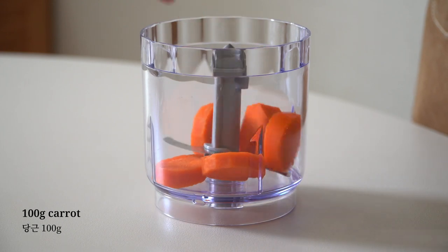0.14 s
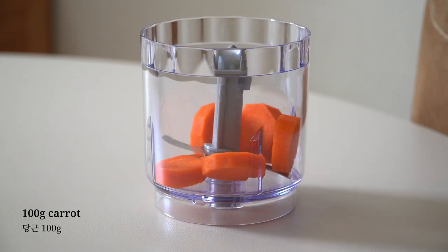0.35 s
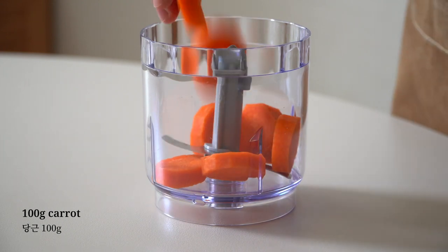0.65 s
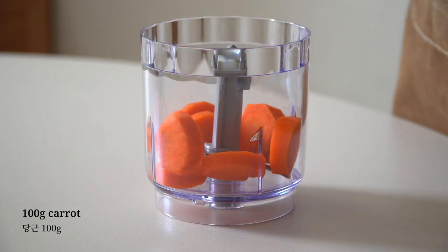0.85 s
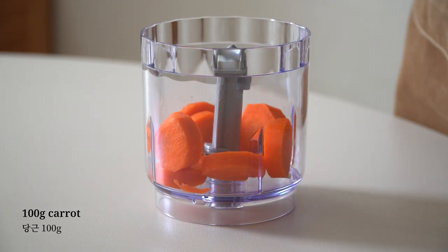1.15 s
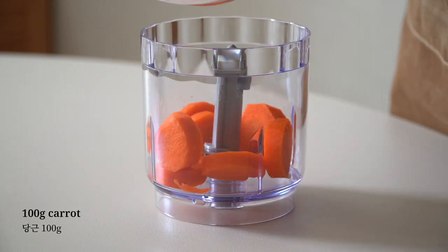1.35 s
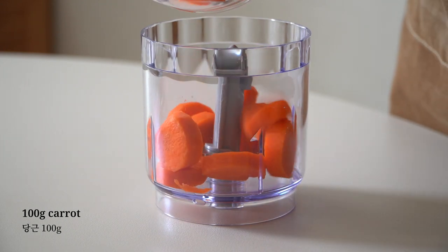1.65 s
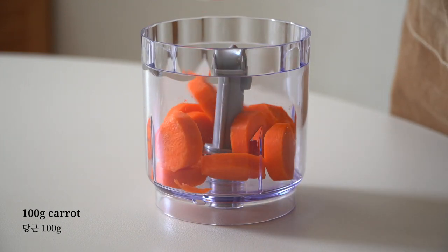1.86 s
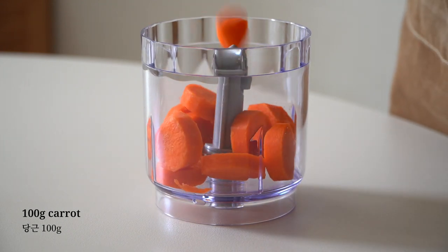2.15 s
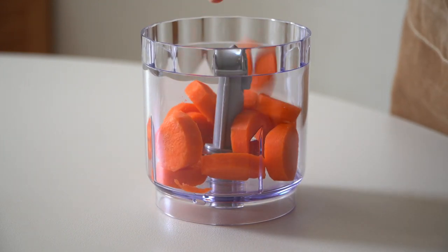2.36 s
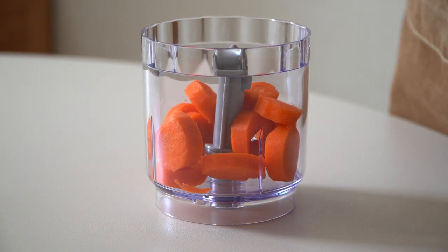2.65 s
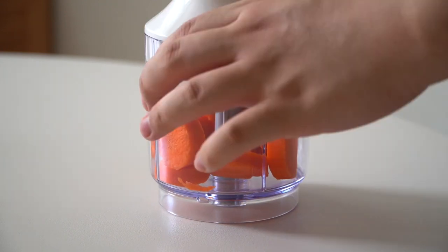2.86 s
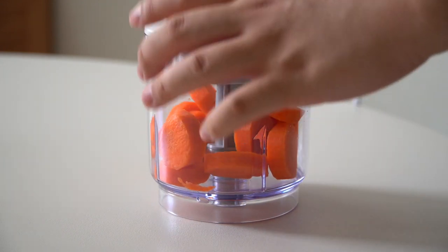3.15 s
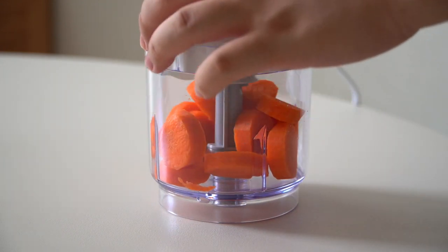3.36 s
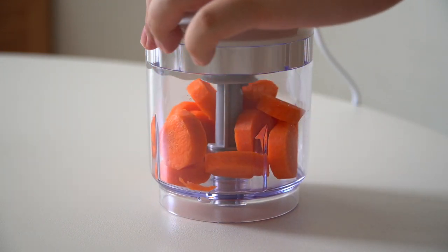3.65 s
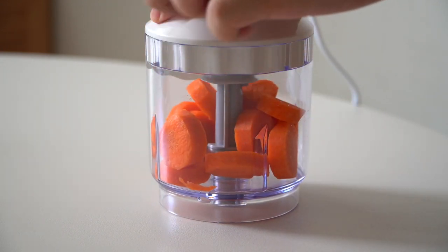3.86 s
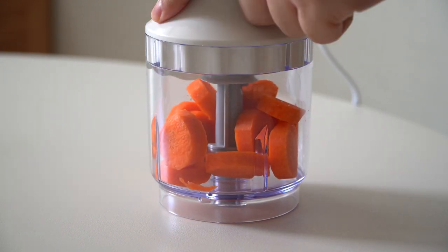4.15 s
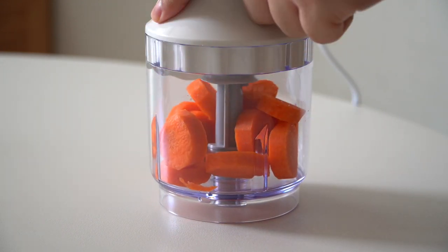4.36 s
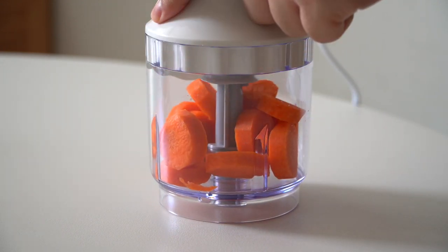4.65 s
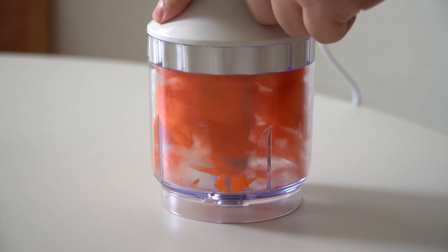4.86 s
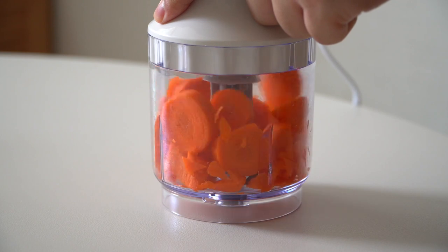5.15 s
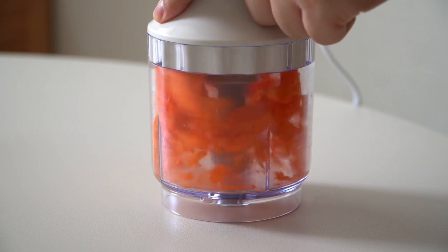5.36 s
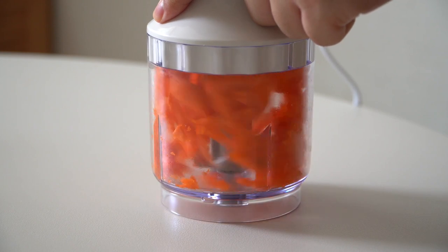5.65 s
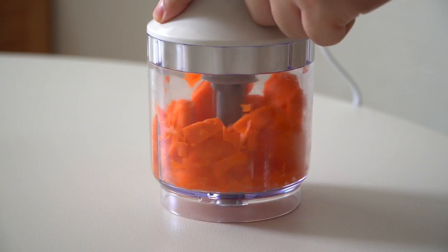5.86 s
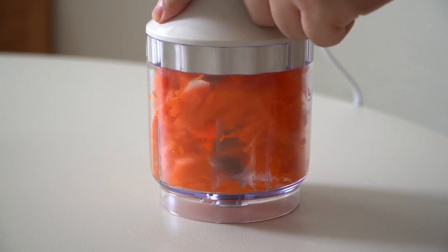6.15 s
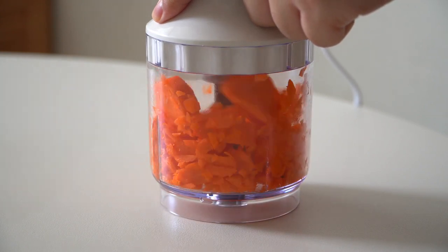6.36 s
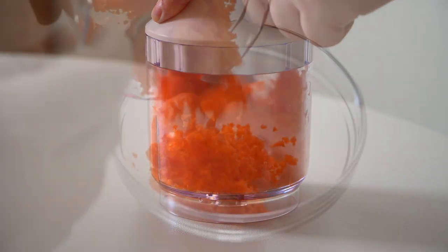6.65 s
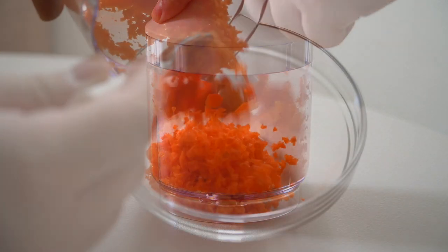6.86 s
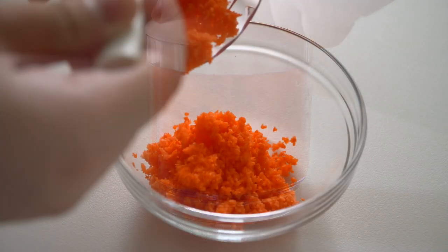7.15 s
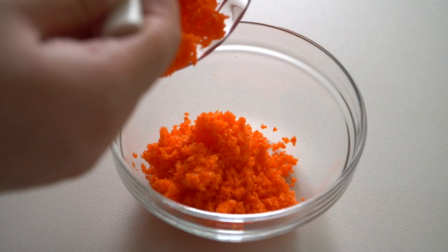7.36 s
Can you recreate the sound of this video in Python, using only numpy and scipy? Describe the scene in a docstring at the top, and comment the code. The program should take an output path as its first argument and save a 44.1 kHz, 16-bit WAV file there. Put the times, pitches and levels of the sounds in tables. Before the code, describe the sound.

Carrot slices drop into the plastic bowl of an electric chopper in several clattering handfuls, thumping and lightly ringing the blade. Faint finger rubs, plastic ticks and soft thuds follow as the motor head is seated. The chopper then runs in five short pulses, the last one faint, its gears whining while pieces crack and rattle against the wall. A utensil clinks once on the bowl. The sounds are close, in a small hard room.

```python
"""Carrot slices knock into the plastic bowl of an electric chopper, thump the table, ring the blade.
Fingers rub, plastic ticks, a dish is tapped; the motor head thuds into its seat.
Five pulses, the last faint: gears whine, the blade hacks pieces and flings them at the wall.
A utensil clinks on the bowl as it is emptied. A small hard room answers."""
import sys
import numpy as np
from scipy import signal
from scipy.fft import rfft, irfft, next_fast_len
from scipy.io import wavfile

SR = 44100
rng = np.random.default_rng(int(sys.argv[2]) if len(sys.argv) > 2 else 0)


def waveform_to_disk(signal):
    """Save audio, clipped to [-1, 1], as 16-bit WAV at the path in sys.argv[1]."""
    frames = np.transpose(np.atleast_2d(signal))
    scaled = np.clip(frames, -1, 1) * 32767
    samples = np.round(scaled).astype(np.int16)
    wavfile.write(sys.argv[1], SR, samples)


N = 331191
TIME_S = np.arange(N) / SR
AGE_S = TIME_S[:SR // 2]  # time since a blow

# slices landing: t/s, level/dB, relative thump/dB, relative blade ring/dB
LANDINGS = [(0.009, -16.5, 6, -8), (0.058, -17.5, 0.5, -7.5), (0.068, -17.5, -12.5, -6),
            (0.077, -11.5, -5, -7), (0.113, -20, -7.5, -5.5), (0.205, -23.5, 3.5, -27.5),
            (0.228, -24, 2.5, -29), (0.724, -33, 14, -8), (0.752, -13, -2, -23), (0.769, -9, -8, -19),
            (0.797, -18, 1.5, -23.5), (0.823, -19.5, 2, -16.5), (0.843, -18.5, -2, -3.5),
            (0.874, -22, -2, -31), (1.318, -52.5, 9.5, -14), (1.393, -43, 7.5, -20), (1.514, -12, 0.5, -33),
            (1.597, -17, 3, -25), (1.611, -19, 0.5, -8), (1.621, -9, -1, -33), (1.65, -17, 2.5, -31),
            (1.659, -12.5, -12, -28), (1.718, -18.5, 0, -26), (1.76, -23.5, 2, -14.5),
            (1.823, -20, 3.5, -23), (1.853, -15, 6, -23), (1.963, -26, 5, -21.5),
            (1.991, -30.5, 15.5, -11.5), (2.02, -39.5, -8, -15), (2.204, -27.5, 8.5, -27.5),
            (2.246, -13, -6, -29), (2.281, -12.5, -4.5, -27.5), (2.313, -7.5, -9.5, -25),
            (2.447, -9.5, -8, -34)]
# bowl, blade and table: f/Hz, level/dB, t60/s
BOWL_MODES = [(93, -24.5, 0.35), (158, -19, 0.33), (295.6, -1, 0.14), (386, -7, 0.18), (462, -0.5, 0.08),
              (502.4, 2, 0.055), (596.6, -8, 0.13), (827.6, 7.5, 0.055), (912.4, -3.5, 0.094),
              (983.6, 0.5, 0.038), (1190, -14, 0.031), (1467, -10.5, 0.068), (1650, -21.5, 0.01),
              (2230, -23, .03), (2994, -4.5, 0.044), (4140, -6.5, 0.069), (5170, -7, 0.047),
              (5970, -4.5, 0.036), (6530, -20, 0.039), (6800, -12, 0.045), (7360, -21, 0.039)]
# contact noise: f/Hz, level/dB
CONTACT_SPECTRUM = [(100, -4), (500, -4.5), (1200, 5), (2500, -0.5), (6500, 3), (8000, -8.5), (15000, -20)]
# plastic ticks, latch clicks: t/s, peak/dB, centre f/Hz
PLASTIC_TICKS = [(0.4078, -46, 2980), (0.977, -39, 4770), (1.7345, -36, 3100), (2.1751, -42.5, 4290),
                 (2.241, -24, 6220), (2.978, -32.5, 5600), (3.1052, -47, 6030), (3.3007, -46.5, 5000),
                 (3.361, -41.5, 2630), (3.3945, -42.5, 3000), (3.4373, -30.5, 4060), (4.515, -53, 3400)]
# fingers on slices and motor head: t/s, level/dB, rise/s, fall/s
FINGER_STROKES = [(.52, -62.5, .13, .09), (1.08, -56.5, .12, 0.21), (2.98, -62, 0.21, .06),
                  (3.43, -57.5, 0.058, .09), (4.06, -65, 0.44, 0.27)]
# skin friction: f/Hz, level/dB
RUB_SPECTRUM = [(400, 7.5), (1500, 2), (4000, -2), (6500, -5), (9000, -17.5), (15000, -18)]
# taps on the dish of slices: t/s, peak/dB, brightness f/Hz
DISH_TAPS = [(1.142, -32.5, 8900), (1.173, -39.5, 9000), (1.411, -45.5, 3000), (1.468, -36.5, 2400)]
# dish: f/Hz, level/dB, t60/s
DISH_MODES = [(1030, -8, 0.077), (2225, -5, 0.067), (2366, -5, 0.061), (2990, -14, 0.03), (4250, -5, 0.11),
              (6590, -6, 0.07), (9900, -13, 0.033)]
# head being seated, one late bowl bump: t/s, level/dB, clack over thud/dB
SEAT_BUMPS = [(2.807, -39, 6.5), (3.107, -58.5, 5), (3.306, -55.5, -27), (3.424, -52.5, -4),
              (3.472, -53, -18), (3.553, -47.5, -10), (3.583, -52.5, -13), (3.852, -63, 6.5),
              (7.444, -49, 5)]
# bump noise: f/Hz, level/dB
THUD_SPECTRUM = [(40, -7), (90, -10), (155, 11), (280, -9.5), (500, -10.5), (1400, -16), (2200, -34.5),
                 (8000, -44.5)]
# button presses: on/s, off/s, settle/s, top shaft f/Hz, motor/dB, jolt/dB, tumble/dB, chip/dB,
# fall-back lift/dB
PULSES = [(4.723, 4.891, 5.07, 399.5, -38.5, -10.5, -27.5, -29.5, 4),
          (5.301, 5.477, 5.6444, 400.3, -36.5, -7.5, -28.5, -28.5, 1),
          (5.917, 6.088, 6.223, 423, -38, -11.5, -27.5, -27.5, -1),
          (6.497, 6.638, 6.759, 407, -36, -17.5, -31, -30, 0),
          (7.066, 7.215, 7.135, 407, -58.5, -31, -42, -41, -1.5)]
# gear and commutator tones: shaft order, level/dB
WHINE_ORDERS = [(2, -6), (6, -8), (9.4, -4), (10.1, 2), (15, -7), (18, -11), (24.8, -21), (25.4, -19.5),
                (26, -20.5)]
# gear noise: f/Hz, level/dB
GEAR_SPECTRUM = [(40, -39), (100, -26), (200, -9), (800, -2.5), (1400, 1.5), (4300, -12), (5000, 4),
                 (7200, -3), (8200, -8.5), (16000, -36.5)]
# tumbling chunks: f/Hz, level/dB
TUMBLE_SPECTRUM = [(40, -44), (70, -20), (110, -10.5), (158, -5), (240, -6), (290, -6), (335, -6.5),
                   (380, -2), (455, 0.5), (510, -6), (606, -7), (660, -8.5), (800, 4), (900, -3.5),
                   (1400, -2.5), (2300, -14.5), (3200, -41.5), (5000, -100)]
# splitting chips: f/Hz, level/dB
CHIP_SPECTRUM = [(900, -15.5), (1800, 4.5), (3000, 3), (4200, 4), (4900, -1), (6000, -4), (7100, 1),
                 (7900, -11), (10000, -15.5), (13000, -23.5), (16000, -34.5)]
# closed bowl: f/Hz, width/Hz, lift/dB
CAVITY_PEAKS = [(165.3, 32, 7), (293.6, 12.3, 10), (424, 420, 2), (588.4, 55, 7.5), (849, 99, -3.5),
                (2830, 300, 2), (6070, 220, 8.5)]
# big pieces hitting the bowl wall: t/s, level/dB
BIG_CRACKS = [(4.7291, -9.5), (4.7558, -9), (4.8211, -15), (4.9656, -9), (5.1373, -19.5), (5.3103, -11.5),
              (5.444, -14), (5.5178, -14), (5.773, -33), (6.1595, -14.5), (6.28, -14.5), (6.5145, -12.5),
              (6.7563, -24), (6.88, -33.5), (6.9501, -38.5)]
# bowl wall: f/Hz, level/dB, t60/s
WALL_MODES = [(1375, -11.5, 0.013), (2517, -6.5, 0.047), (3120, -6.5, 0.031), (4220, -6.5, 0.038),
              (5630, -5.5, 0.0091), (6610, -0.5, 0.022), (7140, -2, 0.022)]
# utensil on bowl: t/s, knock/dB, ping/dB
UTENSIL_HITS = [(7.3747, -15, -6.5)]
# its knock and ping: f/Hz, level/dB, t60/s
UTENSIL_MODES = [(827, -10, 0.059), (1143, 5.5, 0.024), (1100, 5, 0.013), (2955, -19, 0.2),
                 (3040, 5, 0.0067), (4220, 6, 0.0062), (5000, -4, 0.0087), (5480, -5, .011),
                 (6240, -1.5, 0.0069), (6700, -13, 0.0092), (7500, -25, .035)]
# room decay: f/Hz, t60/s
ROOM_DECAY = [(100, 0.55), (300, 0.21), (900, 0.43), (3000, 0.46), (7000, 0.33), (14000, 0.17)]
# room reflections: f/Hz, level/dB
ROOM_COLOUR = [(100, -7), (300, 10.5), (900, -1.5), (3000, -3), (7000, -5), (14000, 0)]
# room tone: f/Hz, level/dB
AIR_SPECTRUM = [(15, -51.5), (25, -40), (149, -13), (285, -6), (309, -24), (373, -11.5), (405, -17.5),
                (659, -17.5), (754, -18), (1040, -24.5), (2410, -29), (3080, -31.5), (16000, -40.5)]


def amp(db):
    """Decibels to gain."""
    return 10 ** (np.asarray(db) / 20)


def unit(x):
    """Scale to rms 1."""
    return x / np.sqrt(np.mean(x ** 2) + 1e-20)


def crest(x):
    """Scale to peak 1."""
    return x / (np.abs(x).max() + 1e-20)


def along(points, hz):
    """Interpolate (f/Hz, value) points on a log axis."""
    points_hz, values = np.transpose(points)
    return np.interp(np.log(hz + 1), np.log(points_hz + 1), values)


def filtered(x, response):
    """Apply gain response(f/Hz)."""
    size = next_fast_len(len(x) + 8192)
    return irfft(rfft(x, size) * response(np.fft.rfftfreq(size, 1 / SR)), size)[:len(x)]


def noise(spectrum, size):
    """Coloured noise, rms 1."""
    return unit(filtered(rng.standard_normal(size), lambda hz: amp(along(spectrum, hz))))


def wobble(knots_per_s):
    """Random curve, linear between knots."""
    knots = rng.standard_normal(int(N * knots_per_s / SR) + 2)
    return np.interp(TIME_S * knots_per_s, np.arange(len(knots)), knots)


def fade(t60_s, attack_s):
    """Envelope of a blow."""
    return 10 ** (-3 * AGE_S / t60_s) * (1 - np.exp(-AGE_S / attack_s))


def burst(spectrum, t60_s, attack_s):
    """Decaying noise of a blow."""
    return noise(spectrum, len(AGE_S)) * fade(t60_s, attack_s)


def ring(modes, attack_s, scatter_db, detune=0):
    """Damped modes; strength, phase and optional detuning drawn per blow."""
    out = np.zeros(len(AGE_S))
    for hz, db, t60_s in modes:
        envelope = amp(db + scatter_db * rng.normal()) * fade(t60_s, attack_s)
        detuned_hz = hz * (1 + detune * rng.normal())
        out += envelope * np.sin(2 * np.pi * (detuned_hz * AGE_S + rng.random()))
    return out


def band(x, lo_hz, hi_hz):
    """Causal band-pass."""
    return signal.sosfilt(signal.butter(3, [lo_hz, hi_hz], "band", fs=SR, output="sos"), x)


def add(track, t_s, sound):
    """Mix in at t_s."""
    part = track[max(round(t_s * SR), 0):][:len(sound)]
    part += sound[:len(part)]


def contact(lo_hz, hi_hz, attack_s, noise_t60_s, noise_db, detune):
    """One register of the bowl, detuned by leaning slices, plus contact noise."""
    register = [mode for mode in BOWL_MODES if lo_hz <= mode[0] < hi_hz]
    modes = ring(register, attack_s, scatter_db=4, detune=detune)
    touch = band(burst(CONTACT_SPECTRUM, noise_t60_s, attack_s), lo_hz, hi_hz)
    return crest(crest(modes) + amp(noise_db) * crest(touch))


def slices(flop_delay_s=.017):
    """A slice thumps with its soft face, knocks with its firm rim, rings the blade, flops flat."""
    out = np.zeros(N)
    for t_s, db, thump_db, ring_db in LANDINGS:
        thump = contact(70, 650, attack_s=.002, noise_t60_s=.06, noise_db=-5.5, detune=.012)
        knock = contact(700, 1100, attack_s=.0025, noise_t60_s=.03, noise_db=-6, detune=.025)
        clack = contact(1100, 2250, attack_s=.0016, noise_t60_s=.038, noise_db=8, detune=.053)
        blade = contact(2600, 3600, attack_s=.00086, noise_t60_s=.027, noise_db=-9, detune=.0095)
        snap = contact(3600, 16000, attack_s=.0005, noise_t60_s=.025, noise_db=3, detune=.014)
        flop = contact(270, 1700, attack_s=.003, noise_t60_s=.11, noise_db=3, detune=.028)
        on_bowl = amp(thump_db - 4.5) * thump + amp(-2) * knock + amp(-11.5) * clack
        on_blade = amp(ring_db) * blade + amp(.63 * ring_db - 6) * snap
        add(out, t_s, amp(db) * (on_bowl + on_blade))
        add(out, t_s + flop_delay_s * rng.uniform(.8, 1.2), amp(db - 15) * flop)
    return band(out, 80, 18000)


def ticks():
    """Small hard contacts: a dry snap in one broad resonance."""
    out = np.zeros(N)
    for t_s, db, hz in PLASTIC_TICKS:
        resonance = [(hz / 8, -16), (hz / 2, -11), (hz, 0), (hz * 1.23, -9), (hz * 3, -23)]
        add(out, t_s, amp(db) * crest(burst(resonance, t60_s=.018, attack_s=.00041)))
    return out


def fingers(edge_db=10):
    """Skin slides on slices and plastic: uneven hiss, edge_db down one rise or fall from its peak."""
    level = sum(amp(db - edge_db * np.maximum((t_s - TIME_S) / rise_s, (TIME_S - t_s) / fall_s))
                for t_s, db, rise_s, fall_s in FINGER_STROKES)
    return level * amp(1.4 * wobble(40)) * noise(RUB_SPECTRUM, N)


def dish_taps():
    """The dish rings briefly; a softer touch omits its upper modes."""
    out = np.zeros(N)
    for t_s, db, bright_hz in DISH_TAPS:
        modes = crest(ring(DISH_MODES, attack_s=.0004, scatter_db=2))
        touch = crest(burst(CONTACT_SPECTRUM, t60_s=.019, attack_s=.0003))
        tap = band(modes + touch, bright_hz / 9 + 500, bright_hz * 1.14)
        add(out, t_s, amp(db) * crest(tap))
    return out


def bumps():
    """The heavy head thuds through the bowl into the table."""
    out = np.zeros(N)
    for t_s, db, clack_db in SEAT_BUMPS:
        thud = crest(band(burst(THUD_SPECTRUM, t60_s=.2, attack_s=.00046), 38, 390))
        clack = crest(band(burst(THUD_SPECTRUM, t60_s=.092, attack_s=.0024), 450, 9500))
        add(out, t_s, amp(db + 2) * (thud + amp(clack_db) * clack))
    return out


def chopper(spin_up_s=.05, coast_s=.17, catch_s=.0045, bite_s=.021, fall_lead_s=.023, fall_width_s=.028):
    """Per press: the drive jolts, bites the heap, coasts; pieces fall back and settle."""
    shaft_hz, drive, tumbling, chipping, jolts = np.zeros((5, N))
    for on_s, off_s, settle_s, top_hz, motor_db, jolt_db, tumble_db, chip_db, fall_db in PULSES:
        since_s = np.maximum(TIME_S - on_s, 0)
        settling_s = np.maximum(TIME_S - settle_s, 0)
        slowed = 1 - np.exp(-np.maximum(TIME_S - off_s, 0) / coast_s)
        speed = (1 - np.exp(-since_s / spin_up_s)) ** .4 * (1 - slowed)  # torque peaks at standstill
        shaft_hz = np.where(TIME_S > on_s, top_hz * speed, shaft_hz)
        drive += amp(motor_db) * np.clip(speed * 2.5 - 1, 0, 1)
        caught = 1 - np.exp(-since_s / catch_s)
        bite = np.exp(-since_s / bite_s)
        falling = np.exp(-((TIME_S - settle_s + fall_lead_s) / fall_width_s) ** 2)
        # a coasting blade shoves more, cuts less
        tumbling += caught * amp(tumble_db + fall_db * falling + 6 * bite + 3.5 * slowed - 144 * settling_s)
        chipping += caught * amp(chip_db + 8.5 * bite - 3 * slowed - 202 * settling_s)
        add(jolts, on_s, amp(jolt_db) * crest(burst(CONTACT_SPECTRUM, t60_s=.028, attack_s=.0004)))
    return jolts + drive * motor(shaft_hz) + hacking(shaft_hz, tumbling, chipping) + cracks(chipping)


def motor(shaft_hz):
    """Shaft orders waver and flutter with gear play; gear noise pulses once a turn."""
    turns = np.cumsum(shaft_hz * (1 + .028 * wobble(600))) / SR
    whine = np.zeros(N)
    for order, db in WHINE_ORDERS:
        flutter = 1 + .7 * wobble(260)
        whine += amp(db) * unit(flutter * np.sin(2 * np.pi * (order * turns + rng.random())))
    gears = noise(GEAR_SPECTRUM, N) * (1 + .5 * np.sin(2 * np.pi * turns))
    return amp(.5) * whine + amp(-1.5) * gears


def impacts(rate_per_s, spread_db=4.5):
    """Random impulses of uneven size, unit mean power."""
    size = amp(spread_db * np.clip(rng.standard_normal(N), -2, 2)) * rng.choice([-1, 1], N)
    chance = rate_per_s / SR
    return unit(size) * (rng.random(N) < chance) / np.sqrt(chance)


def closed_bowl(x, spectrum, size=8192):
    """Impulses ring through the bowl's resonances; minimum phase."""
    hz = np.fft.rfftfreq(size, 1 / SR)
    lift_db = sum(db / (1 + ((hz - f_hz) / (width_hz / 2)) ** 2) for f_hz, width_hz, db in CAVITY_PEAKS)
    level_db = np.maximum(along(spectrum, hz) + lift_db, -90)
    cepstrum = irfft(np.log(amp(level_db)))
    response = irfft(np.exp(rfft(2 * cepstrum[:size // 2], size)))
    return signal.fftconvolve(x, response / np.linalg.norm(response))[:N]


def hacking(shaft_hz, tumbling, chipping):
    """A faster blade strikes more pieces; chips shatter in clusters."""
    blows = impacts(300 + 1.2 * shaft_hz)
    splits = impacts(600 + 4 * shaft_hz) * unit(amp(1.6 * wobble(90)))
    return closed_bowl(tumbling * blows, TUMBLE_SPECTRUM) + closed_bowl(chipping * splits, CHIP_SPECTRUM)


def cracks(chipping, small_per_s=17):
    """The blade splits crisp pieces and slams them into the wall; small ones follow the chipping."""
    out = np.zeros(N)
    slots_s = np.arange(PULSES[0][0], PULSES[-1][0], 1 / small_per_s)
    times_s = slots_s + rng.random(len(slots_s)) / small_per_s
    gains = np.interp(times_s, TIME_S, chipping) * amp(9.5 + rng.standard_normal(len(times_s)))
    big = [(t_s, amp(db), -19.5) for t_s, db in BIG_CRACKS]
    small = [(t_s, gain, -11) for t_s, gain in zip(times_s, gains)]
    for t_s, gain, crisp_db in big + small:
        split = burst(CONTACT_SPECTRUM, t60_s=.012, attack_s=.00039)
        wall = crest(ring(WALL_MODES, attack_s=.0004, scatter_db=3, detune=.015))
        knock = contact(350, 1700, attack_s=.0013, noise_t60_s=.078, noise_db=9, detune=.032)
        slam = crest(crest(band(split, 180, 7400)) + wall) + amp(-7.5) * knock
        crisp = amp(crisp_db) * crest(band(split, 10000, 16000))
        add(out, t_s, gain * (slam + crisp))
    return out


def clink():
    """A hard utensil on the hand-held bowl: hollow knock under a quickly damped ping."""
    out = np.zeros(N)
    low = [mode for mode in UTENSIL_MODES if mode[0] < 2000]
    high = [mode for mode in UTENSIL_MODES if mode[0] > 2000]
    for t_s, knock_db, ping_db in UTENSIL_HITS:
        knock = crest(ring(low, attack_s=.0004, scatter_db=.5))
        ping = crest(ring(high, attack_s=.0003, scatter_db=.5))
        click = crest(burst([(60, 1.5), (6000, 2), (15000, -18.5)], t60_s=.0078, attack_s=.00022))
        add(out, t_s, amp(knock_db) * knock + amp(ping_db) * (ping + amp(-4) * click))
    return out


def kitchen(x, build_s=.0074, gap_s=.0028):
    """Diffuse tail of a small hard room, building after the first wall; redrawn per overlapping block."""
    out, hop = np.zeros(N), SR // 6
    padded, window = np.pad(x, (hop, 2 * hop)), signal.get_window("hann", 2 * hop)
    onset = 1 - np.exp(-np.maximum(AGE_S - gap_s, 0) / build_s)
    for start in range(0, N + hop, hop):
        hz, t_s, bins = signal.stft(rng.standard_normal(len(AGE_S)), SR, nperseg=256)
        decay = 10 ** (-3 * t_s / along(ROOM_DECAY, hz)[:, None])
        colour = amp(along(ROOM_COLOUR, hz))[:, None]
        tail = signal.istft(bins * decay * colour, SR, nperseg=256)[1][:len(AGE_S)] * onset
        wet = signal.fftconvolve(padded[start:start + 2 * hop] * window, tail / np.linalg.norm(tail))
        add(out, max(start - hop, 0) / SR, wet[max(hop - start, 0):])
    return out


def scene():
    """Sources, reverb and room tone; mono."""
    drops, clicks, thuds, utensil = slices(), ticks() + dish_taps(), bumps(), clink()
    machine = band(chopper(), 60, 20000)
    direct = drops + clicks + thuds + utensil + machine + fingers()
    send = (amp(-8.5) * drops + amp(-15.5) * clicks + amp(-6.5) * thuds
            + amp(-8) * utensil + amp(-9) * machine)
    return (direct + kitchen(send) + amp(-65) * noise(AIR_SPECTRUM, N))[None]


def record(dry):
    """Soft peak limit, then brick-wall low-pass."""
    ceiling, top_hz = .36, 16200
    limited = dry[0] / (1 + np.abs(dry[0] / ceiling) ** 6) ** (1 / 6)
    return filtered(limited, lambda hz: hz < top_hz)[None]


dry = scene()
out = record(dry)
waveform_to_disk(out)
```